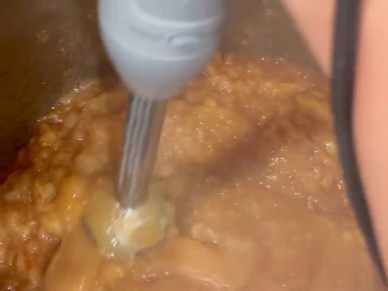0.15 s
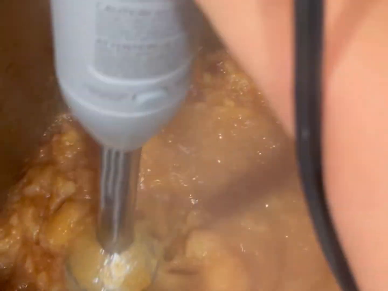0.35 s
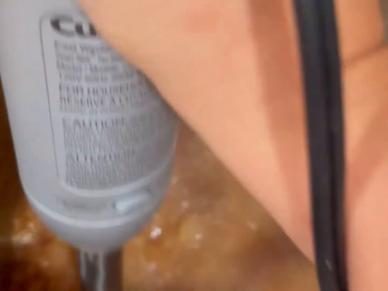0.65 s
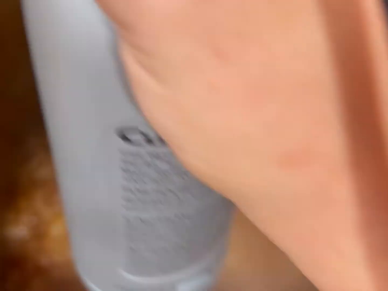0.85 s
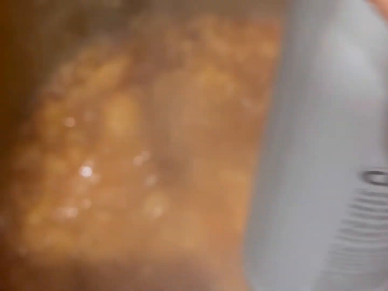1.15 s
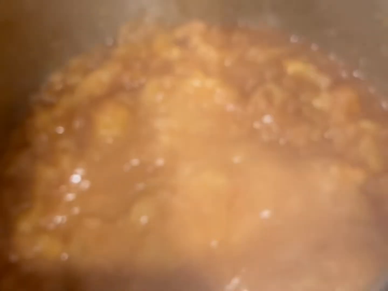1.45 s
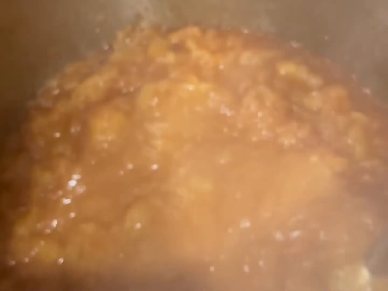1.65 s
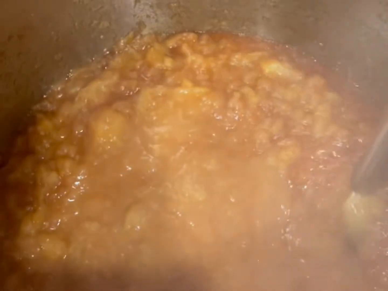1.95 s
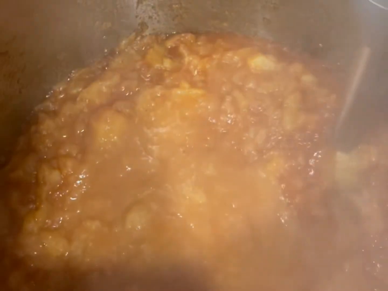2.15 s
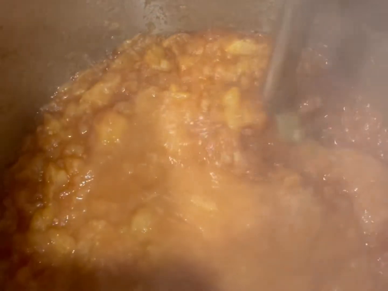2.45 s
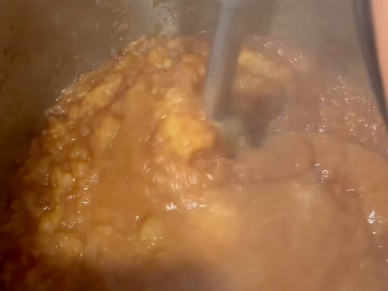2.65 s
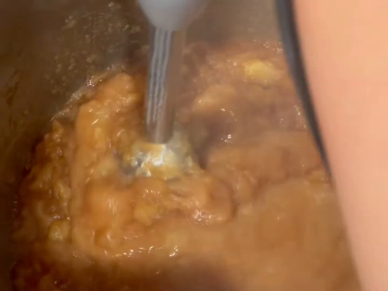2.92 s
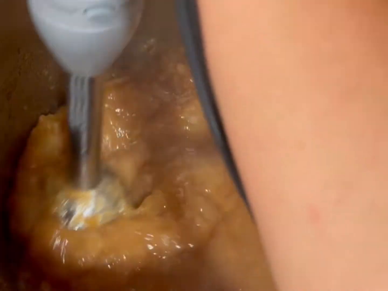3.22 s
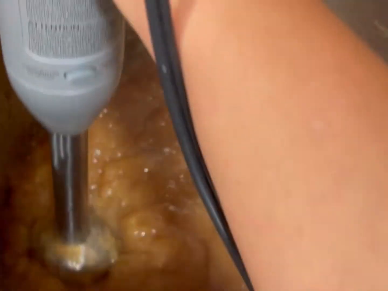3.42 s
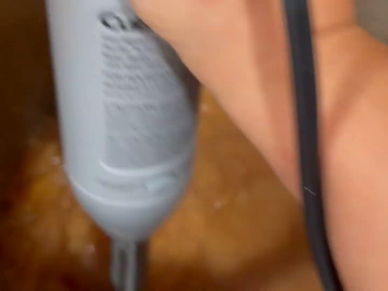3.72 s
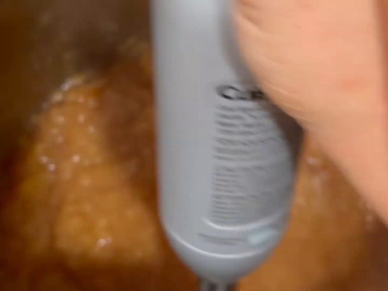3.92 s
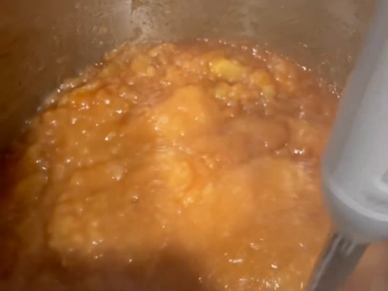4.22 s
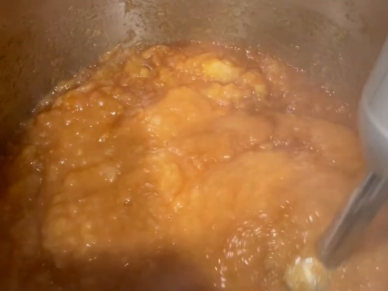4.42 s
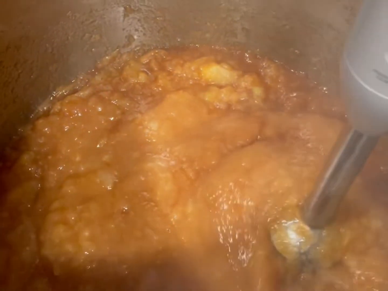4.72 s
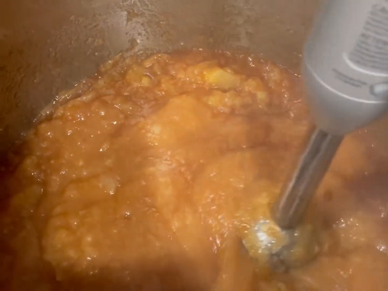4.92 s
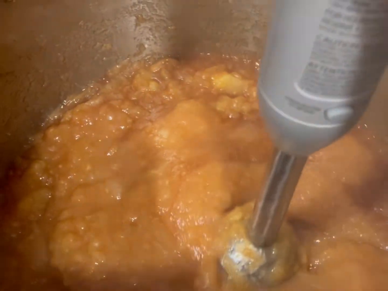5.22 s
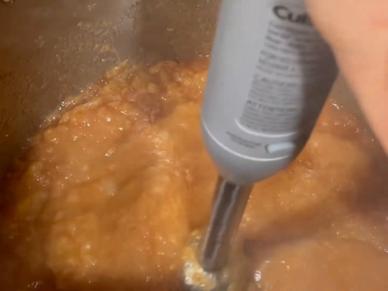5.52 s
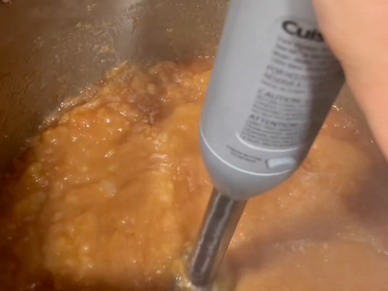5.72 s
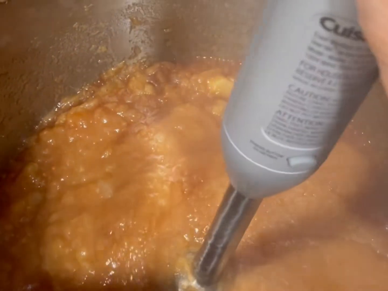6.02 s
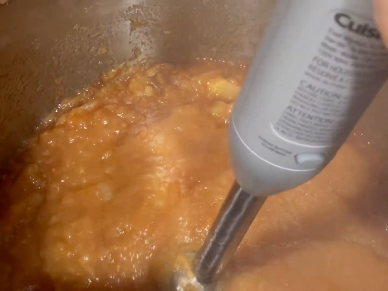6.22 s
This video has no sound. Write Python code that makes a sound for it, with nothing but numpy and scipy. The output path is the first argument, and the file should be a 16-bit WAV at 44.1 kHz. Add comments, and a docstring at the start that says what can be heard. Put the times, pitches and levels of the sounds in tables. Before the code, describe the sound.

A hand-held immersion blender drones and whines in a pot of soft cooked fruit, slurping air and snapping through lumps.

```python
"""Kitchen, stereo microphone close to a pot of soft cooked fruit, a hand-held immersion blender running.
From the start the two-winged blade drones and churns, air slurps round the guard, the brush motor whines.
At 1.3 s the head plunges and lumps snap against it; near 2.4 s thick fruit loads the motor and it sags.
The head rides shallow and draws air, then plunges again near 4 s into a second of lumps and splutter.
After 5 s it churns on, the drone easing, over faint mains hum and the short reflections of the kitchen."""
import sys
import numpy as np
from scipy import signal
from scipy.fft import rfft, irfft
from scipy.io import wavfile

SR = 44100
rng = np.random.default_rng(int(sys.argv[2]) if len(sys.argv) > 2 else 0)


def int16_out(signal):
    """Quantize to a 16-bit WAV file."""
    q = np.round(np.clip(np.atleast_2d(signal).T, -1, 1) * 32767)
    wavfile.write(sys.argv[1], SR, q.astype(np.int16))


N = 280476
T = np.arange(N) / SR
HZ = np.fft.rfftfreq(N, 1 / SR)
HUM_HZ = 120  # twice the mains frequency


# how hard the blade beats the pulp: time_s, level_db
DRONE = [(0.0, -31), (0.05, -22), (0.16, -19), (0.97, -37.5), (1.19, -38), (1.26, -19), (1.39, -15.5),
         (1.52, -16), (1.59, -23), (1.81, -21), (1.84, -31), (1.87, -24), (2.02, -21), (2.06, -33),
         (2.09, -19), (2.15, -18), (2.5, -40), (2.6, -23), (2.99, -23), (3.42, -39), (3.65, -31.5),
         (3.88, -39), (4.02, -16.5), (4.08, -16.5), (4.19, -22.5), (4.225, -17), (4.5, -18), (4.84, -23.5),
         (4.89, -15), (4.92, -24), (4.975, -10.5), (5.005, -27), (5.04, -15), (5.13, -20), (5.4, -23),
         (5.8, -34), (6.36, -28.5)]
# resonances of the guard in the pulp: pitch_hz, width_hz, level_db
GUARD_MODES = [(251.2, 29, -13.5), (281, 47, -11), (341.6, 35, -2)]
def blade(turns):
    """Two wings beat the pulp twice a turn and ring the shaft; the deeper, the more the guard rings."""
    drone_db, = follow(DRONE)
    depth_db, _ = effort()
    waver = gain_of(np.maximum(1.3 + 0.04 * depth_db, 1) * wander(rate_hz=54))
    tone = evened(waver * np.cos(4 * np.pi * turns + 0.07 * wander(22)))
    guard = evened(sum(ringing(*mode) for mode in GUARD_MODES))
    unbalance = evened((1 + 0.37 * wander(5.4)) * np.cos(2 * np.pi * turns + 0.68 * wander(3.1)))
    shaft = ringing(hz=289, width_hz=18, db=-9)
    beating = gain_of(-1.16) * tone + gain_of(depth_db - 11) * guard + shaft
    unbalance_gain = gain_of(-53) + gain_of(drone_db - 31 + 1.3 * depth_db)
    return gain_of(drone_db) * beating + unbalance_gain * unbalance


# shaft speed, sagging where thick fruit loads the blade: time_s, speed_hz
SHAFT_SPEED = [(0, 156.6), (.45, 155.8), (.69, 154), (.83, 150), (1.05, 150), (1.21, 152), (1.33, 156),
               (1.4, 163), (1.46, 164), (1.52, 162.3), (1.65, 162.9), (1.85, 159.3), (2.02, 161),
               (2.22, 161.3), (2.32, 143), (2.44, 133), (2.58, 158.5), (2.8, 156.8), (3.03, 157.4),
               (3.13, 152.6), (3.35, 152.3), (3.48, 149.5), (3.72, 153.9), (3.97, 155.8), (4.05, 161.5),
               (4.13, 164.8), (4.25, 164), (4.5, 163.4), (4.9, 162.7), (5.3, 161.3), (5.45, 158.8),
               (5.6, 156.5), (5.85, 159.3), (6.36, 160)]
# how deep the head sits, as the strength of its churning: time_s, level_db
HEAD_DEPTH = [(0.04, -43), (0.09, -40.5), (0.46, -36.5), (1.17, -44), (1.36, -30), (2.24, -28.5),
              (2.27, -31.5), (2.55, -30.5), (2.76, -36), (3.67, -45), (3.9, -43), (4.09, -29),
              (4.17, -32.5), (4.61, -28.5), (5.31, -33.5), (6.3, -29)]
def effort(cruise_db=-34, cruise_hz=158):
    """Depth (dB) and shaft speed (Hz) above the usual working point."""
    return follow(HEAD_DEPTH)[0] - cruise_db, follow(SHAFT_SPEED)[0] - cruise_hz


# spectra of churning pulp, slurping air and fine spray: frequency_hz, level_db
CHURN_SPECTRUM = [(40, -51), (110, -12.5), (155, -9.5), (195, -18.5), (245, 1.5), (350, 5), (410, -3),
                  (470, 4), (590, -7.5), (800, -7.5), (1100, -9.5), (1450, -13), (1700, -15.5),
                  (1930, -9.5), (2100, -20.5), (2350, -21.5), (2900, -31), (5000, -53.5)]
SLURP_SPECTRUM = [(150, -23), (450, -13), (560, -24), (800, 1), (1100, -2.5), (1230, 4.5), (1330, -0.5),
                  (1450, 5), (2100, 4), (2600, 3.5), (3100, -18), (4500, -10), (9000, -53)]
SPRAY_SPECTRUM = [(1200, -44), (2800, 7), (3600, 6.5), (4800, 4), (6000, 2.5), (8000, -2.5), (11000, -24),
                  (14000, -67)]
# the head plunges and throws pulp: start_s, length_s, slurp_boost_db
SPLASHES = [(1.298, 0.25, 3.5), (3.934, 0.27, 1.5), (4.204, 0.11, 3.5), (4.533, 0.075, 5)]
SPLASH_EDGE_S = 0.013
def pulp(turns):
    """Each pass of the blade tears the pulp: low churning, tiny bursting air pockets and fine spray."""
    depth_db, faster_hz = effort()
    splash_db = sum(db * swell(start, length, SPLASH_EDGE_S) for start, length, db in SPLASHES)
    splash_db += 0.24 * wander(14)
    # a shallow, fast blade draws in more air
    slurp_db = -33.5 - 0.42 * depth_db + 0.17 * faster_hz + splash_db
    spray_db = -42 - 0.66 * depth_db + 0.35 * faster_hz + 1.9 * splash_db
    throb = 1 + 0.055 * np.cos(2 * np.pi * turns) + 0.071 * np.cos(4 * np.pi * turns)
    strokes = evened(throb * gain_of(wander(36)))
    bursts = strokes * evened(crackle(per_s=4000, spread_db=3.5) + 1.16 * white())
    churn = colour(strokes * white(), CHURN_SPECTRUM)
    hollow = pot(colour(strokes * white(), SLURP_SPECTRUM))
    slurp = gain_of(-4) * (colour(bursts, SLURP_SPECTRUM) + hollow) + air_pockets(bursts, turns)
    spray = colour(strokes * evened(crackle(per_s=3000, spread_db=4.5) + white()), SPRAY_SPECTRUM)
    return gain_of(depth_db - 29) * churn + gain_of(slurp_db) * slurp + gain_of(spray_db) * spray


# air caught at the blade: start_s, length_s, first_hz, last_hz, level_db, pitch_over_width
AIR_POCKETS = [(0, 0.41, 1300, 1550, -4.5, 2.5), (0.418, 0.36, 1400, 2290, -0.5, 1.27),
               (0.782, 0.27, 2340, 1740, -3.5, 2.3), (0.863, 0.167, 2830, 2560, -2.5, 4.1),
               (1.21, 0.045, 4560, 1880, 1.5, 1.8), (1.233, 0.075, 1500, 850, 4, 1),
               (2.56, 0.13, 640, 790, 0.5, 3), (2.834, 0.31, 1400, 1190, -5.5, 3.1),
               (3.153, 0.55, 2230, 2460, -7, 2.3), (3.343, 0.07, 1960, 1980, -1.5, 15),
               (3.442, 0.19, 1910, 1930, -2, 6.8), (3.707, 0.41, 2320, 2140, -3, 2.2),
               (4.214, 0.045, 3270, 2570, 4.5, 5.7)]
def air_pockets(bursts, turns, ragged_db=2):
    """Pockets of air, chopped once a turn, ring higher as they shrink and lower as they open."""
    out = np.zeros(N)
    wobble = 0.064 * wander(28)
    chopped = bursts * (1 + 0.3 * np.cos(2 * np.pi * turns))
    for start, length, first_hz, last_hz, db, sharpness in AIR_POCKETS:
        width_hz = np.sqrt(first_hz * last_hz) / sharpness
        progress = np.clip((T - start) / length, 0, 1)
        hz = first_hz * (last_hz / first_hz) ** progress + wobble * width_hz
        out += gain_of(db) * swell(start, length, edge_s=0.012) * resonate_steeply(chopped, hz, width_hz)
    return out * gain_of(ragged_db * wander(10))


# air resonances of the pot: pitch_hz, width_hz, level_db
POT_MODES = [(860, 140, -3), (950, 165, 0), (1231, 24, 2), (1470, 194, 1), (1633, 11, -2.5),
             (1922, 75, -1.5), (2235, 117, 1), (2410, 176, -3), (2670, 62, -4.5)]
def pot(x, drift=0.013, shade_db=2.5):
    """The pot's air rings; the moving blender and arm detune and shade each resonance."""
    out = np.zeros(N)
    for hz, width_hz, db in POT_MODES:
        gain = gain_of(db - shade_db * wander(1.4)) / np.sqrt(width_hz)
        out += gain * resonate(x, hz * (1 + drift * wander(1.5)), width_hz)
    return evened(out)


# tones of the motor: shaft_multiple, level_db
WHINE_TONES = [(36, -7), (37, -12), (48, 5.5), (49, -13)]
def whine(angle, mains, swing_rad, lean):
    """Pulsing torque swings the rotor and splits each tone into a cluster; each fades as the body moves."""
    tones = np.zeros(N)
    for multiple, db in WHINE_TONES:
        gain = gain_of(db - 1.1 * wander(1.4))
        swing = swing_rad * (np.sin(mains) + 0.36 * wander(60))
        tones += gain * np.cos(multiple * angle + swing + 1.1 * wander(1.7))
    return evened(tones * (1 + lean * np.cos(mains)) * gain_of(2.8 * wander(30)))


# strength of the whine and the rasp round it: time_s, tones_db, rasp_db
WHINE_LEVEL = [(0, -45, -54), (.35, -48, -41), (.8, -46.5, -50), (1.1, -47, -43.5), (1.33, -48, -42),
               (1.43, -51, -34.5), (1.63, -38.5, -41), (1.78, -43, -42.5), (2.22, -46, -52),
               (2.4, -66, -68), (2.6, -48, -46), (2.95, -49, -58), (3.2, -52, -50), (3.5, -57, -47),
               (3.97, -51, -52), (4.08, -39, -38), (4.5, -39.5, -50), (4.75, -41, -45.5),
               (5.25, -43.5, -43), (5.4, -45, -46), (5.6, -42.5, -43), (5.9, -44.5, -53), (6.36, -46, -54)]
# swing of the rotor: time_s, swing_rad, lean (-1 to the lower side tone, +1 to the upper)
ROTOR_SWING = [(0, 1.1, -.1), (.4, 1.6, -.2), (1.2, 1.6, -.4), (1.42, .7, .2), (1.6, 1.1, .1),
               (1.9, 1.6, -.1), (2.9, 1.5, -.5), (3.9, 1.4, -.6), (4.1, .7, .2), (5.25, .7, .2),
               (5.42, 1.4, -.5), (5.6, .6, .1), (5.85, 1.2, .2), (6.36, 1.2, .2)]
# brush hiss, brush sizzle, housing buzz and whistle of the commutator bars: time_s, level_db
HISS_LEVEL = [(0, -38), (.4, -40.5), (.9, -39), (1.1, -41.5), (1.45, -41), (2.1, -43.5), (2.47, -47),
              (2.6, -42), (3.05, -42), (3.15, -43.5), (3.5, -43), (4.1, -41.5), (4.5, -42), (5.1, -43.5),
              (6.36, -42.5)]
SIZZLE_LEVEL = [(0, -40.5), (.55, -41), (1.1, -54), (1.7, -50), (2.45, -48), (2.6, -41.5), (3.2, -50),
                (4.0, -42), (4.5, -49)]
BUZZ_LEVEL = [(0, -38.5), (.45, -43.5), (1.08, -56), (1.8, -40), (2.22, -45), (2.48, -46), (2.61, -34),
              (2.75, -41), (3.05, -41), (3.2, -55), (3.45, -51), (3.72, -47.5), (4.2, -52), (4.45, -39),
              (5, -36.5), (5.6, -42.5), (6.36, -50)]
BAR_LEVEL = [(3.2, -65), (4.1, -54), (5.6, -62), (5.85, -53), (6.36, -53.5)]
# spectrum of the brush hiss: frequency_hz, level_db
BRUSH_SPECTRUM = [(1500, -29), (4000, -37), (5000, -16), (5800, -0.5), (6500, -3.5), (7600, -0.5),
                  (8400, 4.5), (9200, 9), (11100, 0.5), (12000, -10), (13000, -60), (15000, -88)]
def motor(turns):
    """Brushes scrape the commutator and the housing buzzes; the current swells twice a mains cycle."""
    curves = HISS_LEVEL, SIZZLE_LEVEL, BUZZ_LEVEL, BAR_LEVEL, SHAFT_SPEED
    hiss_db, sizzle_db, buzz_db, bar_db, speed_hz = (follow(curve)[0] for curve in curves)
    whine_db, rasp_db = follow(WHINE_LEVEL)
    swing_rad, lean = follow(ROTOR_SWING)
    mains, angle = 2 * np.pi * HUM_HZ * T, 2 * np.pi * turns
    tones = gain_of(whine_db + 6) * whine(angle, mains, swing_rad, lean)
    sizzle = ringing(71 * speed_hz, width_hz=650, db=sizzle_db)
    rasp = ringing(48 * speed_hz - 50, width_hz=520, db=rasp_db + 4)
    chatter = (rasp + sizzle) * (1 + 0.37 * np.cos(mains))
    contact = evened((1 + 0.14 * np.cos(angle) + 0.074 * np.cos(2 * angle)) * gain_of(wander(7.6)))
    scrape = evened(white() + 1.1 * crackle(per_s=2800, spread_db=0.5))
    hiss = gain_of(hiss_db + 10) * colour(contact * scrape, BRUSH_SPECTRUM)
    bars = gain_of(bar_db) * evened(np.cos(24 * angle + swing_rad / 2 * np.sin(mains)))
    buzz = gain_of(buzz_db) * evened(np.cos(4 * angle + 0.45 * wander(35)))
    return tones + hiss + chatter * contact + (bars + buzz) * (1 + 0.3 * wander(10.4))


# the largest lumps the blade strikes: start_s, knock_db, snap_db, spit_db, pitch_hz
LUMPS = [(1.353, -15, -23, -36, 6000), (1.36, -20, -23.5, -31, 5670), (1.382, -22, -22, -31, 7500),
         (1.389, -24, -25, -33, 6600), (1.467, -22, -27.5, -31, 5930), (2.175, -32, -45, -34, 6000),
         (2.216, -39, -37, -29, 6500), (2.614, -39, -28.5, -22, 8000), (2.957, -31, -39, -36, 7000),
         (3.048, -38, -31, -28, 7500), (3.983, -18.5, -43, -48, 4200), (3.9885, -19.5, -44, -45, 4000),
         (4.0197, -17, -48, -38, 4000), (4.053, -13.5, -30, -23.5, 6070), (4.0758, -16, -35, -39, 4200),
         (4.091, -26, -34, -48, 4000), (4.1292, -20, -40, -45, 4200), (4.2237, -20, -32, -38, 6330),
         (4.241, -19.5, -25.5, -36, 6600), (4.268, -25, -38, -40, 5700), (4.283, -19.5, -24.5, -33, 6900),
         (4.311, -26, -21, -30, 6200), (4.348, -47, -26.5, -28, 6800), (4.518, -28, -35, -33, 5900),
         (4.545, -25.5, -39, -42, 4000), (4.558, -20.5, -37, -41, 5700), (4.567, -24, -32, -32, 7000),
         (4.583, -33, -33, -45, 5600), (4.602, -27.5, -32, -42, 6400), (4.613, -38, -29.5, -40, 6600),
         (4.691, -44, -34.5, -32, 6500), (4.777, -31, -24, -26.5, 6650), (4.815, -31, -28.5, -38, 5840),
         (4.831, -27, -32, -34, 6050), (4.851, -36, -32, -40, 6900), (4.895, -23.5, -31, -31, 5500),
         (5.028, -28.5, -29.5, -36, 5700), (5.072, -41, -32, -48, 7300), (5.128, -44, -36, -33, 6000)]
# spectra of the low knock, wet snap and high spit: frequency_hz, level_db
KNOCK_SPECTRUM = [(50, -25), (130, -3), (300, 19.5), (600, -12), (1300, 5), (2400, 1), (4000, -1),
                  (8000, -47)]
SNAP_SPECTRUM = [(1200, -19), (3500, 1), (5000, -1.5), (6200, 0), (7500, -2), (9000, 9), (13000, -44)]
SPIT_SPECTRUM = [(5000, -37), (8000, -10.5), (9300, 10), (10500, 3.5), (12000, -9), (13500, -19),
                 (15500, -35)]
def lumps(knock_s=0.0045, snap_s=0.0036, spit_s=0.0047):
    """A lump cracks between blade and guard: a spit, a pitched wet snap and a knock that rings the pot."""
    knocks, snaps, spits, cracks, snap_hz = np.zeros((5, N))
    for start, knock_db, snap_db, spit_db, hz in LUMPS:
        first = round(start * SR)
        age = T[:N - first]
        knocks[first:] += gain_of(knock_db) * np.exp(-age / knock_s)
        snaps[first:] += gain_of(snap_db) * np.exp(-age / snap_s)
        spits[first:] += gain_of(spit_db) * np.exp(-age / spit_s)
        cracks[first] = 7  # the first crack stands above the burst that follows
        snap_hz[first:] = hz
    knock = colour(knocks * (cracks + white()), KNOCK_SPECTRUM)
    snap = colour(snaps * (cracks + white()), SNAP_SPECTRUM)
    spit = colour(spits * white(), SPIT_SPECTRUM)
    ring = sum(gain_of(db) * resonate(knock, hz, width_hz) for hz, width_hz, db in POT_MODES)
    wet = gain_of(0.5) * snap + gain_of(11) * resonate(snap, snap_hz, width_hz=900)
    return gain_of(-3.5) * knock + gain_of(6) * ring + wet + gain_of(9.5) * spit


def splutter():
    """Thrown pulp bursts in separate short pops while the head plunges."""
    plunging = sum(swell(start, length, SPLASH_EDGE_S) for start, length, _ in SPLASHES)
    pops = plunging * evened(noise_bursts(crackle(per_s=170, spread_db=3.5), decay_s=0.00062))
    return gain_of(-35) * (colour(pops, SLURP_SPECTRUM) + gain_of(-5) * colour(pops, SNAP_SPECTRUM))


def bearing_rattle(turns):
    """The shaft rattles in its bearing every turn: a comb of overtones that deep pulp smothers."""
    depth_db, _ = effort()
    comb = np.zeros(N)
    for multiple in range(3, 17):
        gain = gain_of(3 * wander(5))
        comb += gain * np.cos(2 * np.pi * (multiple * turns + rng.random()) + 0.25 * wander(20))
    return gain_of(-42.5 - 0.4 * depth_db) * evened(comb)


def crumbs(per_s=35, spread_db=3):
    """Small bits snap against the guard at random while the head is deep."""
    depth_db, _ = effort()
    hits = (rng.random(N) < per_s / SR) * (depth_db > 0)
    size = gain_of(-38 + spread_db * np.minimum(rng.exponential(1, N), 3))
    return colour(noise_bursts(hits * size, decay_s=0.0015), SNAP_SPECTRUM)


# room tone of the kitchen: frequency_hz, level_db
RUMBLE_SPECTRUM = [(20, -17), (45, 4), (65, 6.5), (100, -5.5), (200, -3), (1000, -6), (8000, -78)]
# the handle passes near the microphone: start_s, length_s, level_db
HANDLE_PASSES = [(0.64, 0.66, -39.5), (1.197, .45, -48), (3.605, 0.66, -48.5)]
def rumble_and_hum():
    """Kitchen rumble and mains hum; the hum swells and flutters as the handle passes near."""
    passing = sum(gain_of(db) * swell(start, length, edge_s=0.14) for start, length, db in HANDLE_PASSES)
    flutter = ringing(hz=113, width_hz=70, db=-1.5)
    hum = evened((1 + 0.3 * wander(2.1)) * np.cos(2 * np.pi * HUM_HZ * T))
    rumble = gain_of(-46) * colour(white(), RUMBLE_SPECTRUM)
    return rumble + gain_of(-55.5) * hum + passing * (flutter + gain_of(-2) * hum)


# time the kitchen takes to die away by 60 dB: frequency_hz, decay_s
ROOM_DECAY = [(200, 0.39), (1000, 0.088), (4000, 0.031), (12000, 0.27)]
# what the kitchen throws back: frequency_hz, gain_db
ROOM_COLOUR = [(60, -40), (300, -14), (550, -3), (750, 13), (1000, 0.5), (1500, -34), (2100, 2.5),
               (2800, 16.5), (4500, 10), (6000, 4), (8000, 7.5), (9200, -27.5), (11000, 4.5), (13000, -1)]
def room(x, turn_hz=1.1):
    """A short diffuse tail, different left and right; the moving arm trades two sets of reflections."""
    hz, t, noise = signal.stft(rng.standard_normal((2, 2, SR // 2)), SR, nperseg=256)
    decay = gain_of(-60 * t / read(ROOM_DECAY, hz)[:, None])
    tails = signal.istft(noise * decay, SR, nperseg=256)[1]
    tails /= np.linalg.norm(tails[0, 0])
    thrown = irfft(rfft(x) * gain_of(read(ROOM_COLOUR, HZ)), N)
    angle = 2 * np.pi * turn_hz * T
    return sum(signal.fftconvolve((thrown * share)[None], tail, axes=1)[:, :N]
               for share, tail in zip((np.cos(angle), np.sin(angle)), tails))


# phase between the microphone ports: frequency_hz, left_lead_rad
PORT_PHASE = [(150, -0.05), (550, -0.4), (900, 0.09), (1300, -0.14), (1450, -0.0), (2100, 0.06),
              (2750, 0.59), (3900, 0.79), (4500, 1.8), (4900, 3.31), (5300, 5.19), (5750, 6.22),
              (6200, 6.35), (6600, 7.04), (8700, 9.32), (9400, 9.52), (11400, 11.62), (11800, 12.33)]
# balance between them: frequency_hz, left_minus_right_db
PORT_BALANCE = [(450, 0), (780, -5), (900, -5), (1400, 1), (2100, -1.5), (2900, -4), (3150, -3.5),
                (4000, 3), (4800, -3), (6000, -1.5)]
def microphone(x):
    """Close to the pot, the direct sound reaches the two ports with different phase and level."""
    half = np.exp(.5j * read(PORT_PHASE, HZ)) * gain_of(read(PORT_BALANCE, HZ) / 2)
    return irfft(rfft(x) * np.array([half, 1 / half]), N)


def gain_of(db):
    """Decibels to amplitude."""
    return 10 ** (np.asarray(db) / 20)


def evened(x):
    """Scales to rms 1."""
    return x / np.sqrt(np.mean(x ** 2) + 1e-20)


def read(points, hz):
    """Joins spectrum points on a log-frequency axis."""
    f, value = np.transpose(points)
    return np.interp(np.log(hz + 1), np.log(f + 1), value)


def follow(rows):
    """The columns of a curve table at every sample."""
    times, *columns = np.transpose(rows)
    return [np.interp(T, times, column) for column in columns]


def swell(start, length, edge_s):
    """Rises, holds and falls, from 0 to 1 and back."""
    return np.clip(np.minimum(T - start, start + length - T) / edge_s, 0, 1)


def white():
    """White noise of rms 1."""
    return rng.standard_normal(N)


def wander(rate_hz):
    """Smooth random motion of rms 1, up to about the given rate."""
    return evened(irfft(rfft(white()) / (1 + (HZ / rate_hz) ** 4), N))


def crackle(per_s, spread_db):
    """Random clicks, many small and a few large."""
    size = gain_of(spread_db * np.minimum(rng.exponential(1, N), 4))
    return evened(size * np.sign(white()) * (rng.random(N) < per_s / SR))


def noise_bursts(clicks, decay_s):
    """Turns each click into a dying burst of noise."""
    return signal.lfilter([1], [1, -np.exp(-1 / (decay_s * SR))], clicks) * white()


def colour(x, spectrum):
    """Causal filter with the given spectral shape and unit energy."""
    log_gain = np.log(gain_of(read(spectrum, abs(np.fft.fftfreq(4096, 1 / SR)))))
    taps = np.fft.ifft(np.exp(np.conj(signal.hilbert(log_gain)))).real[:2048]
    return signal.oaconvolve(x, taps / np.linalg.norm(taps))[:N]


def resonate(x, hz, width_hz):
    """A resonance of gain 1 whose pitch can follow a curve."""
    carrier = np.exp(2j * np.pi * np.cumsum(hz * np.ones(N)) / SR)
    pole = np.exp(-np.pi * width_hz / SR)
    return 2 * (carrier * signal.lfilter([1 - pole], [1, -pole], x / carrier)).real


def resonate_steeply(x, hz, width_hz):
    """The same resonance twice over, scaled to rms 1."""
    return evened(resonate(resonate(x, hz, width_hz), hz, width_hz))


def ringing(hz, width_hz, db):
    """A steep resonance kept ringing by noise."""
    return gain_of(db) * resonate_steeply(white(), hz, width_hz)


def scene():
    """One slightly unsteady shaft drives blade, pulp and motor, close up with the kitchen behind."""
    turns = np.cumsum(follow(SHAFT_SPEED)[0] + 0.12 * wander(6.5)) / SR
    blender = blade(turns) + pulp(turns) + motor(turns) + bearing_rattle(turns)
    blender += lumps() + splutter() + crumbs()
    return microphone(blender + rumble_and_hum()) + gain_of(-11) * room(blender)


def record(dry, ceiling=0.9, cutoff_hz=15200):
    """The recorder clips any peak over its ceiling, then cuts the highest treble."""
    lowpass = signal.firwin(511, cutoff_hz, window=("kaiser", 9), fs=SR)
    return signal.oaconvolve(np.clip(dry, -ceiling, ceiling), lowpass[None], "same")


dry = scene()
out = record(dry)
int16_out(out)
```